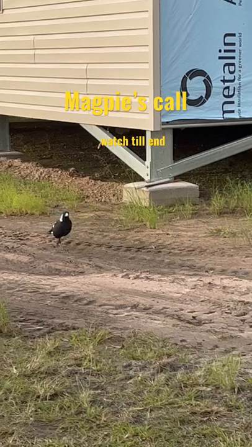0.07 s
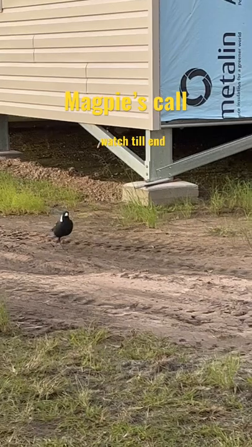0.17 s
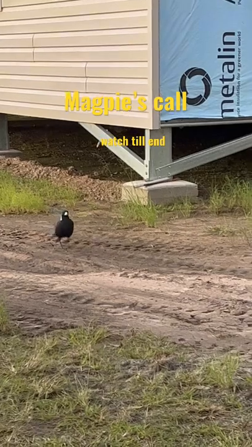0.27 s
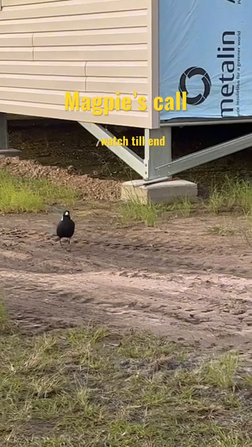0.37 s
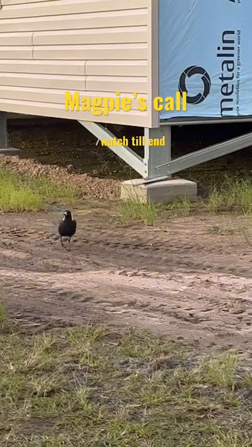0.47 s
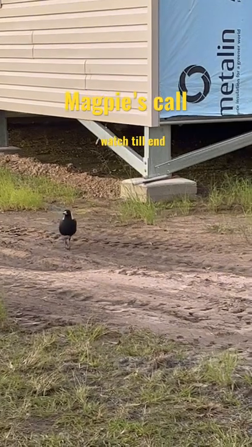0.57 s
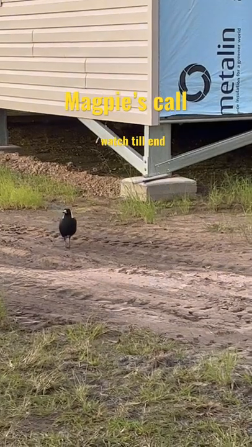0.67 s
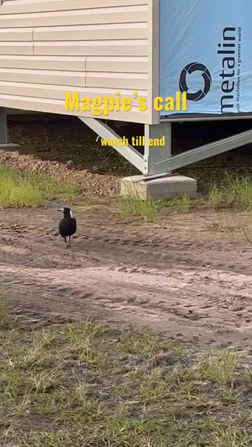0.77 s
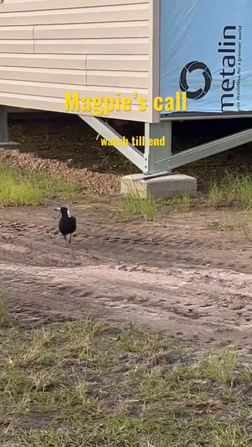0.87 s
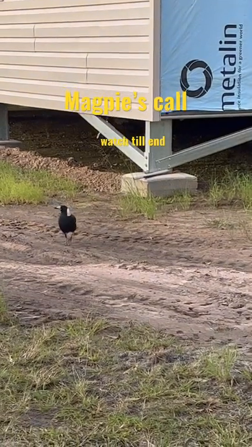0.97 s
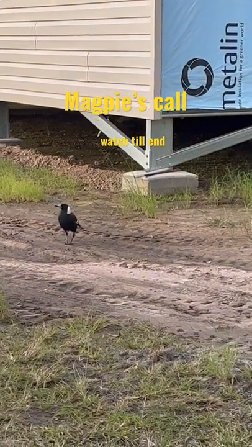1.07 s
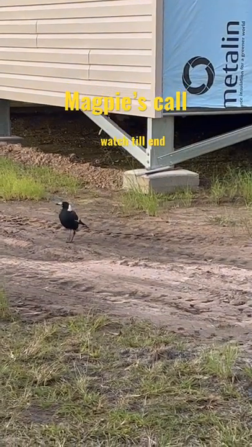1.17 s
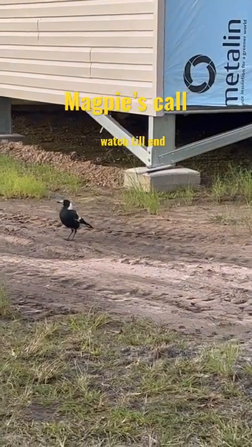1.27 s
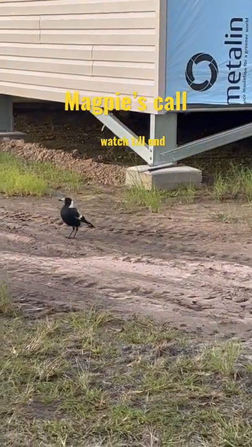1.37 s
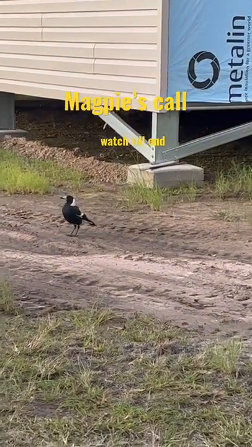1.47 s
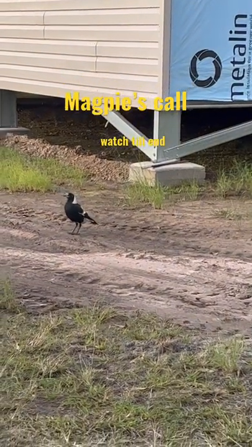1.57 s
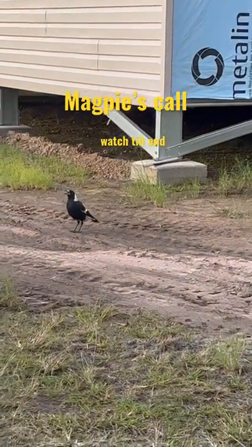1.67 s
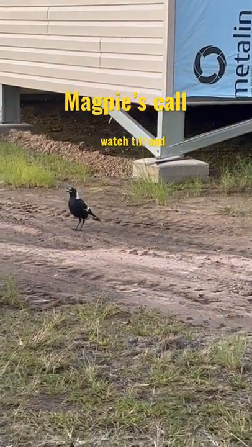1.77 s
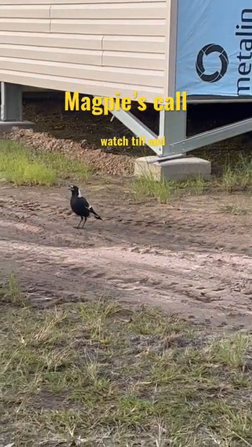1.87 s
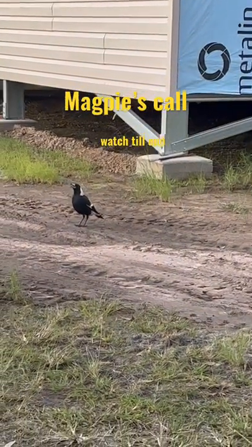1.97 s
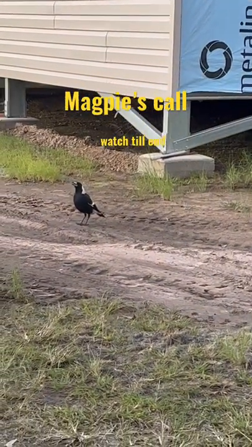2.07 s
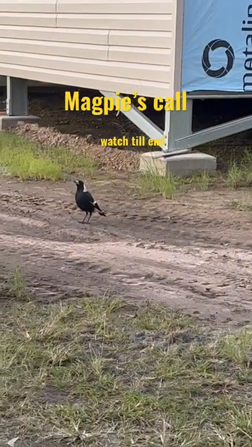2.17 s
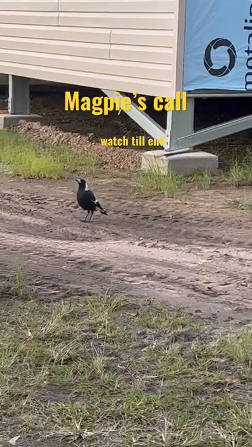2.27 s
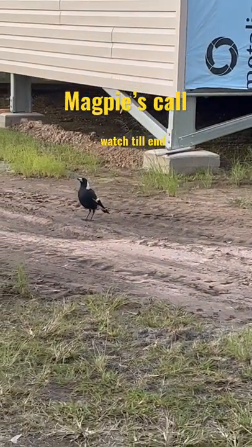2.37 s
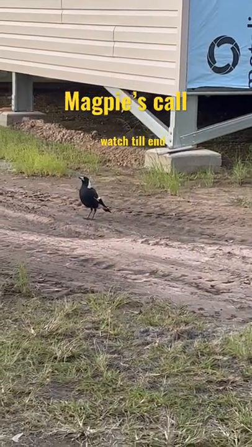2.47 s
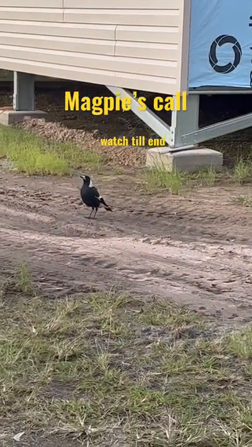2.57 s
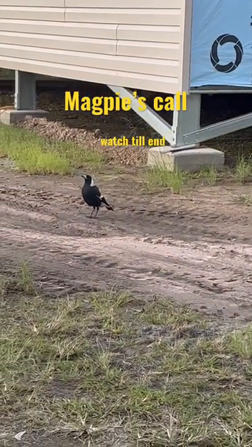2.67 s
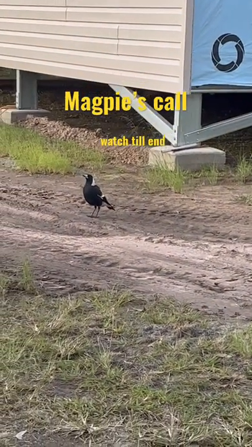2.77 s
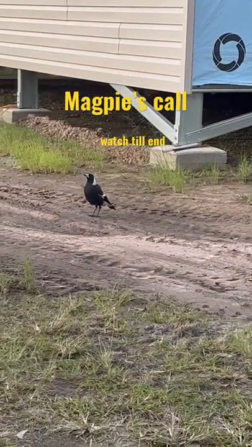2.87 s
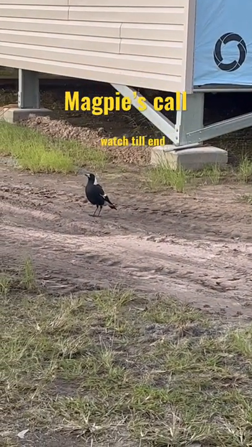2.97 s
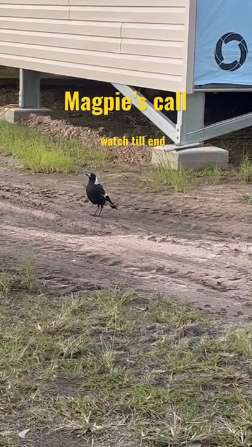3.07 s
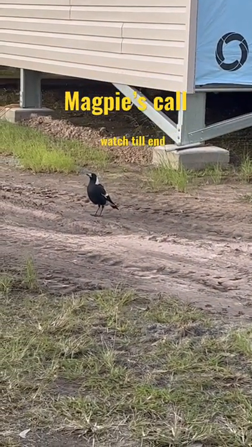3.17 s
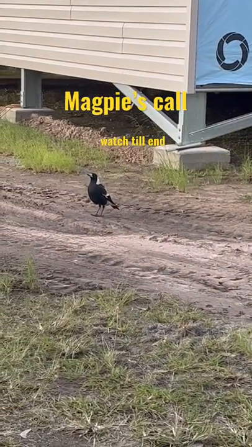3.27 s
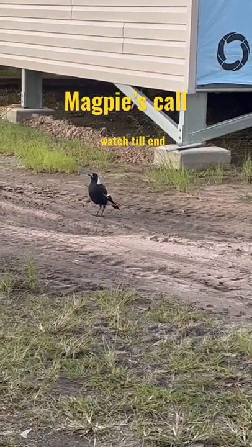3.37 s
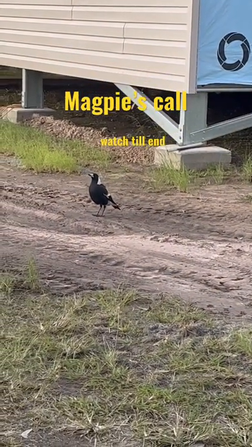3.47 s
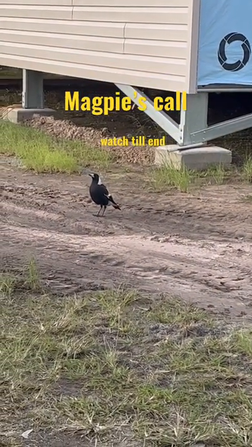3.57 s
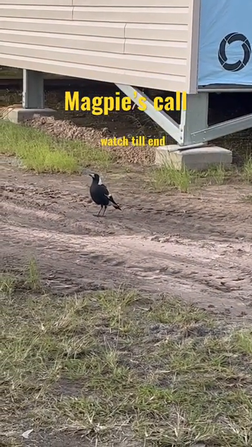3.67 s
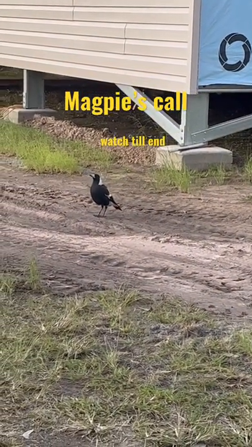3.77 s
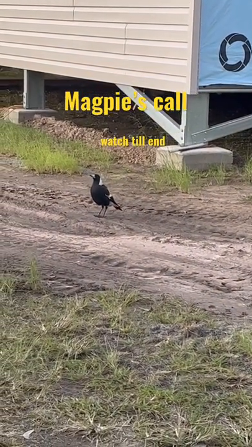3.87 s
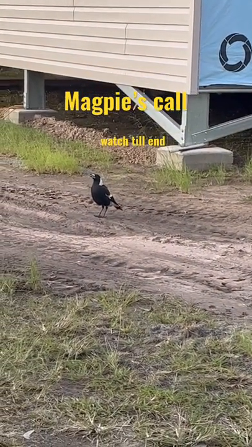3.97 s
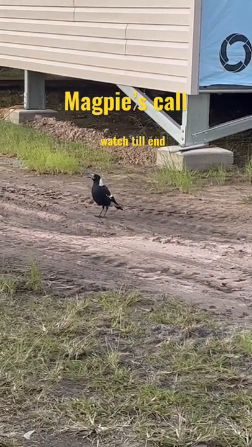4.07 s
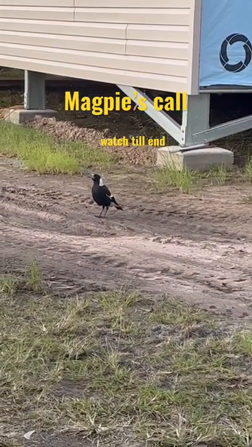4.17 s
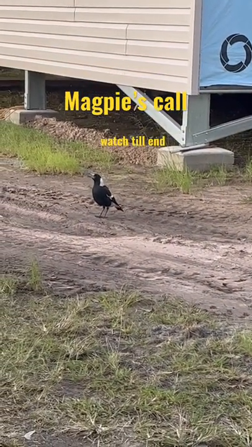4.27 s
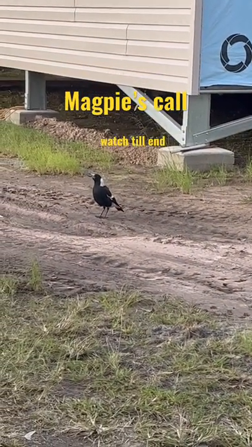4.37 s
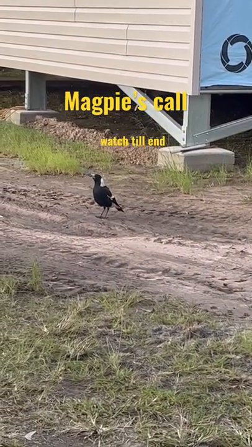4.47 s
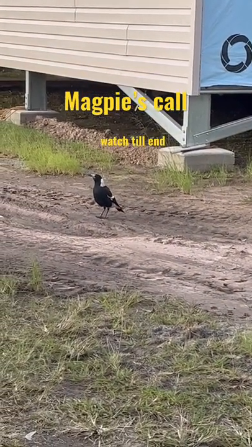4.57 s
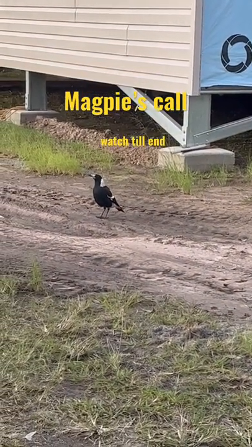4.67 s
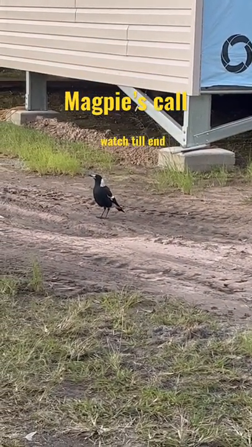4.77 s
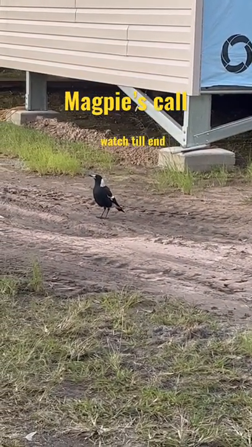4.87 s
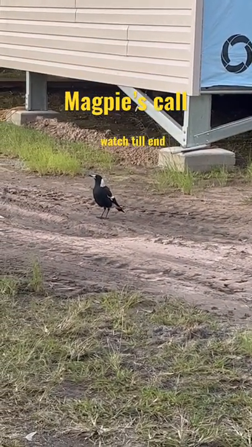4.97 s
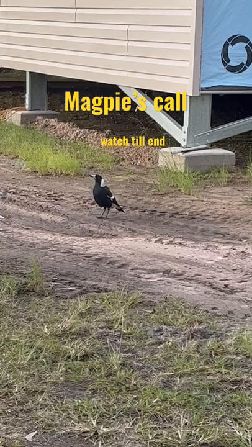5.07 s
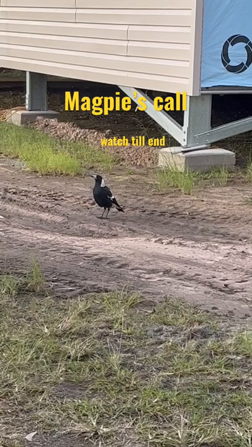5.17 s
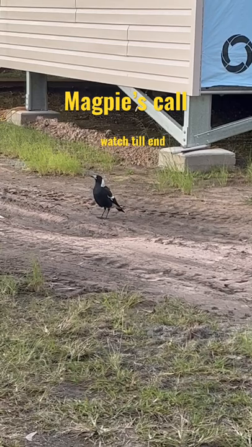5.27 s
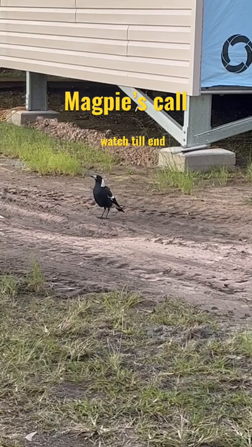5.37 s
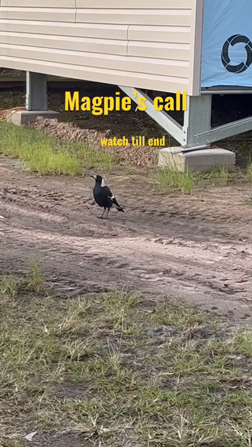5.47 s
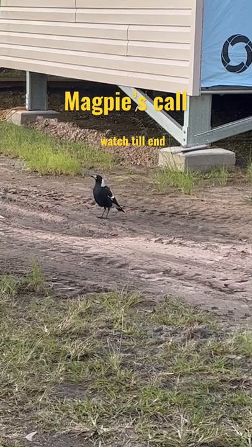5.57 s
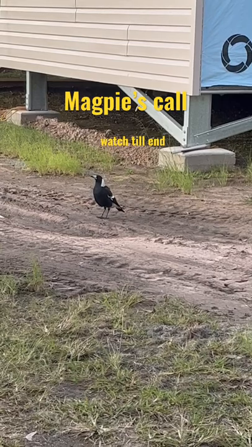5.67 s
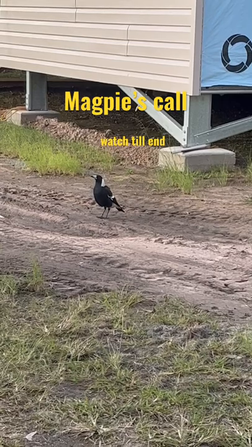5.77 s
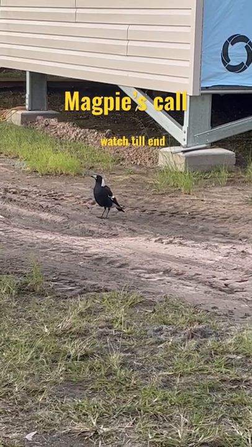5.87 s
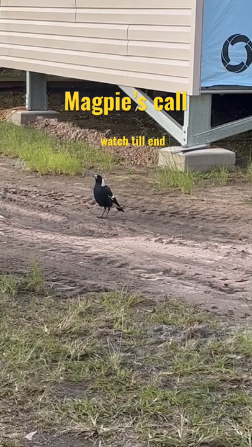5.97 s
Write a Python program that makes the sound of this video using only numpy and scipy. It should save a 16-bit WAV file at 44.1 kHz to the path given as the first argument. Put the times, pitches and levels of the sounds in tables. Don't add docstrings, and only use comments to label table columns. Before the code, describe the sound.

Over a swelling low lorry rumble outdoors, a magpie twice slides from a clear whistle down into a buzzing rasp, with small dry ticks nearby.

```python
import sys
import numpy as np
from scipy import signal
from scipy.fft import rfft, irfft, next_fast_len
from scipy.io import wavfile
from scipy.ndimage import uniform_filter1d

SR = 44100
rng = np.random.default_rng(int(sys.argv[2]) if len(sys.argv) > 2 else 0)


def to_wav(sig):
    pcm = np.clip(np.atleast_2d(sig), -1, 1) * 32767
    pcm = np.round(pcm).astype(np.int16)
    wavfile.write(sys.argv[1], SR, pcm.T)


def invert_db(level):
    return 10 ** (np.asarray(level, dtype=float) / 20)


N = 266011
TIME = np.arange(N) / SR
SIZE = next_fast_len(N + SR // 2)
HZ = np.arange(SIZE // 2 + 1) * SR / SIZE

# time in seconds, engine cycle in Hz, engine level in dB, tyre level in dB,
# both levels counted from the moment it draws level.
LORRY = [(.04, 30.3, -13, -6), (.86, 29.4, -8.5, -4.5), (1.46, 30.2, -5.5, -2.5), (2.1, 29.5, -4, -2),
         (2.57, 28.8, -3, 0), (2.84, 29.5, -0.7, 0.5), (3.27, 29.0, -1, -0.2), (3.55, 28.9, 0.4, -0.13),
         (4.1, 28.8, -0.4, -0.5), (4.6, 28.6, -1, -1.3), (4.9, 27.6, -1.3, -1.1), (5.14, 28.0, -2, -1.4),
         (5.5, 27.6, -1.3, -1.3), (6.03, 27.4, -1, -1)]


def on_log(table, hz):
    f, v = np.transpose(table)
    return np.interp(np.log(hz + 1e-9), np.log(f), v)


def shape(x, gain):
    return irfft(rfft(x, SIZE) * gain, SIZE)[..., :N]


def bump(hz, octaves):
    return np.exp(-.5 * (np.log2((HZ + 1e-9) / hz) / octaves) ** 2)


def walk(rate, size=N):
    step = SR / rate / 4
    knots = rng.standard_normal(int(size / step) + 2)
    knots = uniform_filter1d(uniform_filter1d(knots, size=4), size=3)
    return 2.5 * np.interp(np.arange(size) / step, np.arange(len(knots)), knots)


def call_controls(start, join, peak_db, sag, null_s, gap):
    onset_s, switch_s = .11, .007
    rasp_hz, lowest_hz = 1694, 1370
    end = join + (rasp_hz - lowest_hz) / sag
    span = (TIME > start - onset_s) & (TIME < end)
    t = TIME[span] - start
    since_join = TIME[span] - join
    early, sung, late = t + onset_s, np.maximum(t, 0), np.maximum(since_join, 0)
    second = np.clip(t / switch_s + .5, 0, 1)
    third = np.clip(since_join / switch_s + .5, 0, 1)

    def mix(onset, whistle, rasp):
        return (1 - second) * onset + (second - third) * whistle + third * rasp

    bend_s = .14
    bend_hz = 900 * ((sung - bend_s) ** 2 - bend_s ** 2 / 2)
    whistle_hz = 1968 - sag * sung + bend_hz + 109.2 * np.exp(-sung / .015)
    hz = mix(1740 + 294.6 * np.exp(-early / .045), whistle_hz, rasp_hz - sag * late)
    settle_hz, settle_width_hz = 1656, 18
    hz += (second - third) * settle_width_hz * np.log1p(np.exp((settle_hz - hz) / settle_width_hz))

    onset_db = -17 - 42 * np.exp(-early / .025)
    arch_db = np.maximum(-398.5 * (t - 0.17) ** 2, -6)
    rasp_db = -1.5 - 103 * late - 29 * np.exp((TIME[span] - end) / .008)
    effort_db = peak_db + mix(onset_db, arch_db, rasp_db)

    low_db = mix(-3 + 14 * np.exp(-early / 0.034), -2.0 + 200 * sung ** 3, 11 - 19 * np.exp(-late / 0.086))
    null_db = 20 * np.log10(abs(1 - sung / null_s) + .05)
    even_db = mix(4.7, -2.5 - 70 * sung + null_db, -5 - 12 * np.exp(-late / .06))
    bright_db = mix(-9.0, -6.5 - 6 * np.exp(-sung / 0.018), -11 - 600 * late ** 3)
    bright_db = bright_db - 1.5 * (peak_db + 32.5)
    rush_db = 4 * np.clip(late / 0.22, 0, 1) ** 2
    rasp_air_db = -17.0 - 0.93 * (peak_db + 32) + 68 * late + rush_db
    air_db = mix(4.4, -36 + 26 * np.exp(-sung / .025), rasp_air_db)

    hoarse = mix(0.54, 0.014, .052)
    rasp = np.clip(mix(.05, 0.04, .64) - late, 0, 1)
    beat_hz = third * np.interp(late, *np.transpose(gap))
    return span, hz, effort_db, low_db, even_db, bright_db, hoarse, rasp, beat_hz, air_db


def syrinx(hz, low_db, even_db, bright_db, hoarse, rasp, beat_hz, beat):
    # multiple, level in dB over the brightness.
    upper = [(4, -16.5), (5, -1), (6, -13), (7, -12), (8, -15.5), (9, -27)]
    # frequency in Hz, gain in dB.
    throat = [(1000, 10), (1500, -6), (2100, -13), (3600, -6), (5200, 10.5), (6900, -14), (8200, 1.5),
              (10200, -5), (12000, -3.5), (14500, -10.5), (17000, -22)]
    pipe = np.transpose(throat)
    phase = 2 * np.pi * np.cumsum(hz) / SR - beat / 3 + .75 * hoarse * walk(500, len(hz))
    # (multiple, dB, spread into beat lines)
    partials = [(1, low_db, 0.78), (2, even_db, 0.33), (3, 0.0026, 0.84)]
    for k, db in upper:
        lopsided_db = 12.0 * rasp * (k % 2 == 0)
        partials.append((k, bright_db + db + lopsided_db, 1.7))
    voice = 0
    for k, db, spread in partials:
        centre = k * phase + (k + 1) // 3 * beat
        split = np.clip(spread * rasp, 0, .85)
        given_db = np.interp((k if k < 4 else 5) * hz, *pipe)
        for m, turn in zip(range(-8, 9), 1.1 * rng.random(17)):
            pipe_db = np.interp(k * hz + m * beat_hz, *pipe) - given_db
            level = invert_db(db + pipe_db) * split ** (m * m if k == 1 else abs(m))
            voice = voice + level * np.sin(centre + m * beat - .2 * m * m + turn)
    return np.sqrt(2) * voice * (1 + 0.33 * hoarse * walk(300, len(hz)))


def windpipe_air(rasp, beat):
    # frequency in Hz, width in Hz, level in dB.
    resonances = [(2280, 300, -4.5), (4270, 900, -1.5), (5560, 710, -1.5), (8340, 2600, -1.5),
                  (12740, 2600, -8)]
    puffs = rng.standard_normal(len(beat)) * np.exp(1.6 * rasp * np.cos(beat))
    air = 0
    for hz, width, db in resonances:
        peak = signal.iirpeak(hz, hz / width, SR)
        ringing = signal.lfilter(*peak, signal.lfilter(*peak, puffs))
        air = air + invert_db(db) * np.sqrt(SR / np.pi / width) * ringing
    return air


def magpie_call(call, gap):
    controls = call_controls(*call, gap)
    span, hz, effort_db, low_db, even_db, bright_db, hoarse, rasp, beat_hz, air_db = controls
    beat = 2 * np.pi * np.cumsum(beat_hz * (1 + .04 * walk(70, len(hz)))) / SR
    voice = syrinx(hz, low_db, even_db, bright_db, hoarse, rasp, beat_hz, beat)
    air = invert_db(air_db - 22 * rasp) * windpipe_air(rasp, beat)
    out = np.zeros(N)
    out[span] = invert_db(effort_db) * (voice + air)
    return out


def magpie():
    # whistle start in seconds, second membrane joining in seconds, peak level in dB,
    # pitch sag in Hz per second, vanishing of the second partial in seconds into the whistle.
    sung_calls = [
        (1.645, 1.917, -33.5, 1188, .245),
        (4.038, 4.309, -32, 1276, 0.16),
    ]
    # seconds after joining, gap in Hz.
    gap_curves = [
        [(0, 97.9), (.085, 108.6), (.165, 141.3), (.28, 193.4)],
        [(0, 164), (.035, 116.5), (.155, 129.7), (.26, 172.5)],
    ]
    return sum(magpie_call(call, gap) for call, gap in zip(sung_calls, gap_curves))


def yard(x):
    # delay in seconds, level in dB.
    walls = [
        (.026, -6),
        (0.07, -14),
        (.115, -18),
    ]
    t = np.arange(SR) / SR
    noise = rng.standard_normal((3, SR))
    sparse = invert_db(8.2 * rng.standard_normal(SR // 200 + 1)).repeat(200)[:SR]
    echo = (noise[0] + 0.46 * noise[1:]) * sparse * (t > .012)
    # (Hz, octaves, t60 s, dB)
    bands = [(1770, 0.36, 0.43, -35.5), (4700, 0.67, 0.49, -50), (10220, 0.52, 0.15, -55)]
    wash = 0
    for hz, octaves, t60, db in bands:
        wash = wash + rfft(echo * invert_db(db - 60 * t / t60), SIZE) * bump(hz, octaves)
    apart = .0004 * rng.standard_normal((len(walls), 2, 1))
    slaps = 0
    for (delay, db), offset in zip(walls, apart):
        slaps = slaps + invert_db(db) * np.exp(-2j * np.pi * HZ * (delay + offset))
    return shape(x, wash + slaps * bump(1780, .22))


def ticks():
    # start in seconds, peak level in dB, level in dB of the body below 5 kHz.
    snaps = [(0.2548, -72.5, -16), (0.3803, -53.5, -6), (0.5768, -48, -7), (1.0237, -76, 0),
             (1.3977, -76.5, 2), (2.3078, -69.5, 1), (2.6763, -62, -5), (2.9642, -72, 13), (3.413, -68, 1),
             (3.428, -59, -1), (3.468, -55.5, -4.5), (4.6423, -64, 5.5), (5.1769, -66, -3), (5.303, -69, 3),
             (5.921, -64.5, 12.5)]
    length = 3000
    t = np.arange(length) / SR
    crack = np.exp(-t / .0016)
    rebound = 0.2 * (t > .009) * np.exp(-abs(t - .009) / .002)
    envelope = 1.6 * crack + rebound + 0.12 * np.exp(-t / .025)
    high, low = np.zeros(N + length), np.zeros(N + length)
    for start, db, low_db in snaps:
        snap = invert_db(db) * rng.standard_normal(length) * envelope
        i = int(start * SR)
        high[i:i + length] += snap
        low[i:i + length] += snap * invert_db(min(low_db, 3.0))
    return shape(high[:N], 0.91 * bump(10000, 0.38)) + shape(low[:N], 4.4 * bump(2700, 0.59))


def engine():
    # multiple of the engine cycle, level in dB.
    orders = [(3, -41.5), (5, -42.5), (6, -43)]
    # time in seconds, multiple, half length in seconds, change in dB.
    echo_beats = [(2.17, 3, .1, -8.5), (3.25, 3, 0.27, 9.5), (4.663, 3, .08, -19.5), (.86, 5, 0.34, -16.5),
                  (1.834, 5, 0.21, -16), (2.332, 5, .12, -20), (4.5, 5, 0.22, -19.5), (5.27, 5, 0.047, -22),
                  (5.507, 5, 0.09, -10), (1.462, 6, 0.27, -9.5), (2.54, 6, 0.16, -6.5),
                  (4.76, 6, 0.053, -22.5), (5.95, 5, 0.18, -16), (.04, 6, .12, -10), (2.75, 5, 0.2, 6),
                  (2.0, 6, .15, -3.5), (2.6, 6, 0.12, -6)]
    s, cycle_hz, near_db, _ = np.transpose(LORRY)
    phase = 2 * np.pi * np.cumsum(np.interp(TIME, s, cycle_hz)) / SR
    out = 0
    for k, db in orders:
        echo_db = 0
        for at, order, half, change_db in echo_beats:
            if order == k:
                echo_db = echo_db + change_db * np.exp(-((TIME - at) / half) ** 2)
        level = invert_db(db + np.interp(TIME, s, near_db) + echo_db + 2.74 * walk(4.6))
        out = out + np.sqrt(2) * level * np.sin(k * phase + .4 * walk(2))
    return out


def road(duck_db):
    region_hz = (330, 520, 800, 3000)
    # frequency in Hz, level in dB per Hz.
    road_colour = [(25, -93), (35, -76), (58, -54.5), (120, -59.5), (250, -66.5), (420, -79.5),
                   (620, -79.5), (1000, -75.5), (1500, -82.5), (2100, -87.5), (2600, -93.5), (4000, -102),
                   (5200, -109), (6500, -120)]
    # frequency in Hz, level in dB from the road's last point.
    hiss = [(6500, -9.5), (8000, -6), (15500, -17.5)]
    # frequency in Hz, likeness from 0 to 1.
    likeness = [(100, 1.0), (250, .98), (550, .65), (1200, .85), (1650, .55), (2000, .9), (5000, .87),
                (15000, .9)]
    # frequency in Hz, left minus right in dB.
    balance = [(300, 0.5), (700, -2), (1300, -1.5), (1800, 5), (2500, -0.5)]
    # time in seconds, half length in seconds, level in dB.
    gap_boom = (4.57, 0.47, 14.9)
    s, _, *columns = np.transpose(LORRY)
    near_db, tyre_db = (np.interp(TIME, s, c) for c in columns)
    boom_s, boom_half_s, boom_peak_db = gap_boom
    boom_db = 1.2 * near_db + boom_peak_db * np.exp(-((TIME - boom_s) / boom_half_s) ** 2)
    swell = np.array([near_db, boom_db, tyre_db, 2.8 * tyre_db + duck_db])
    last_db = road_colour[-1][1]
    colour = list(road_colour[:-1]) + [(hz, last_db + db) for hz, db in hiss]
    like = np.clip(on_log(likeness, HZ), 0, 1)
    noise = rfft(rng.standard_normal((3, SIZE)))
    side = invert_db(np.array([[.5], [-.5]]) * on_log(balance, HZ))
    ports = np.sqrt(like) * noise[0] + np.sqrt(1 - like) * noise[1:]
    ports = ports * side * invert_db(44.0 + on_log(colour, HZ))
    out = 0
    for hz in 23 * 2 ** np.arange(0, 9.8, .5):
        place = np.interp(np.log(hz), np.log(region_hz), np.arange(4))
        weight = np.maximum(1 - abs(place - np.arange(4)), 0) * np.clip(2 - hz / 5500, 0, 1)
        band = np.cos(np.pi * np.clip(np.log2((HZ + 1e-9) / hz), -.5, .5)) ** 2
        out = out + irfft(ports * band, SIZE)[:, :N] * invert_db(weight @ swell + 1.1 * walk(6))
    return out


def far_bird():
    # start in seconds, end in seconds, start pitch in Hz, end pitch in Hz, level in dB.
    whistles = [
        (.73, 0.792, 3800, 4050, -76),
        (0.832, 0.872, 4000, 4350, -76),
        (0.842, 0.973, 3470, 3050, -74),
    ]
    out = 0
    for start, end, start_hz, end_hz, db in whistles:
        u = np.clip((TIME - start) / (end - start), 0, 1)
        hz = start_hz + (end_hz - start_hz) * np.sqrt(u)
        out = out + invert_db(db) * np.sin(np.pi * u) * np.sin(2 * np.pi * np.cumsum(hz) / SR)
    return out


def rustle():
    brush = (5.5, .03, 7800, -72)
    at, half, hz, db = brush
    swell = np.exp(-((TIME - at) / half) ** 2)
    return invert_db(db) * shape(rng.standard_normal(N) * swell, 3 * bump(hz, 0.16))


def scene():
    calls = magpie()
    loud = np.clip(uniform_filter1d(abs(calls), size=2000) / invert_db(-42), 0, 1)
    duck_db = -2 * loud
    return calls + yard(calls) + ticks() + engine() + road(duck_db) + far_bird() + rustle()


def band_limit(x):
    return signal.sosfilt(signal.butter(12, 15630, fs=SR, output="sos"), x)


def record(dry):
    # frequency in Hz, lead of the left port in radians.
    port_phase = [(0, 0), (250, -.1), (600, -1.05), (1200, -.5), (1700, -.3), (2600, 2.3), (3900, .9),
                  (4600, 1.4), (5100, 1.45), (5900, 3.14), (8000, 6.3), (10300, 9.4), (14600, 15.7),
                  (22050, 26.5)]
    start_s = .036
    lead = np.interp(HZ, *np.transpose(port_phase))
    top = np.clip((15700 - HZ) / 300, 0, 1)
    mirrored = 2 * dry[:, -1:] - dry[:, -2:-SR // 4:-1]
    carried = np.concatenate([dry, mirrored], axis=1)
    ports = shape(carried, np.exp(.5j * np.array([lead, -lead])) * top)
    return band_limit(ports * np.clip((TIME - start_s) * 500, 0, 1))


dry = scene()
out = record(dry)
to_wav(out)
```